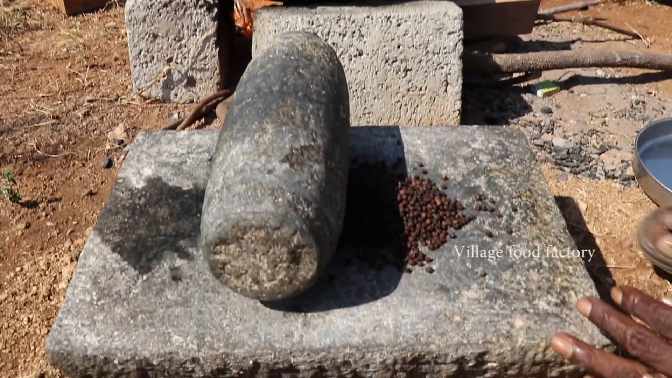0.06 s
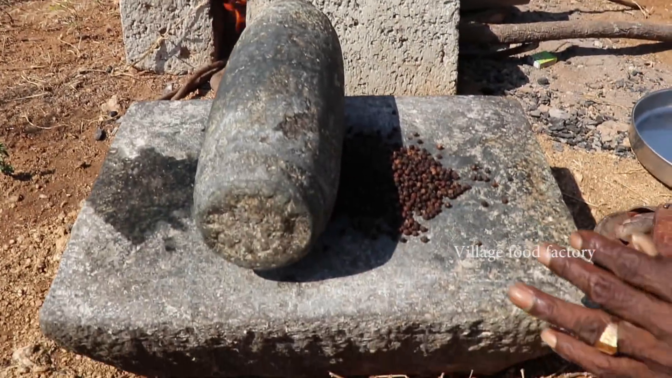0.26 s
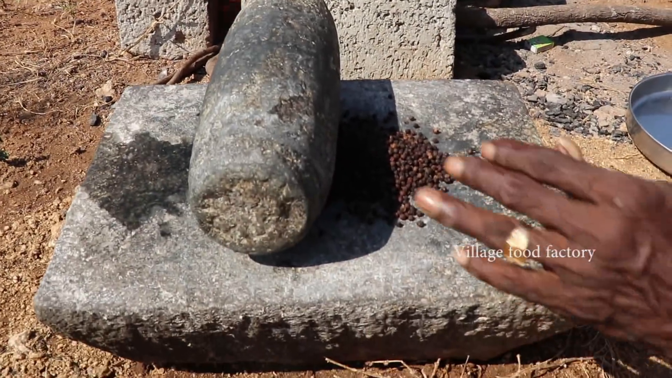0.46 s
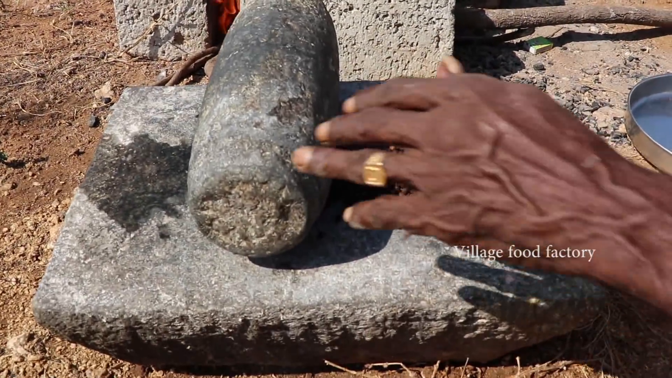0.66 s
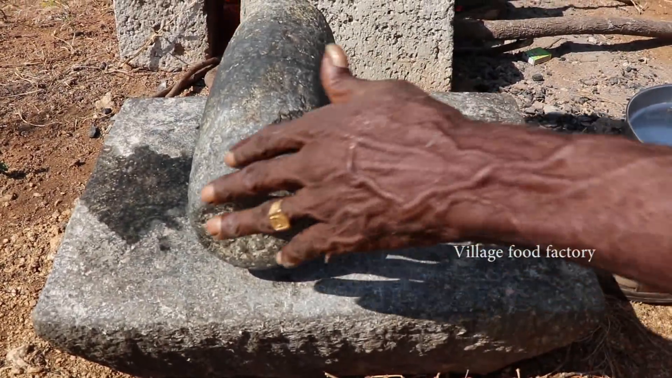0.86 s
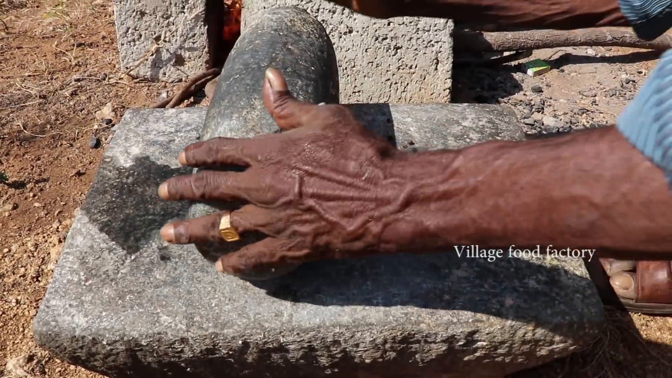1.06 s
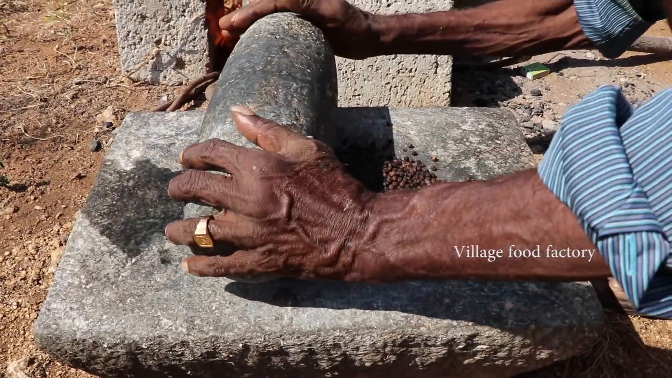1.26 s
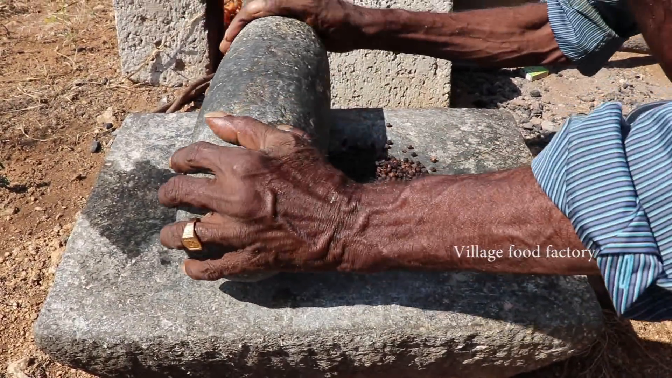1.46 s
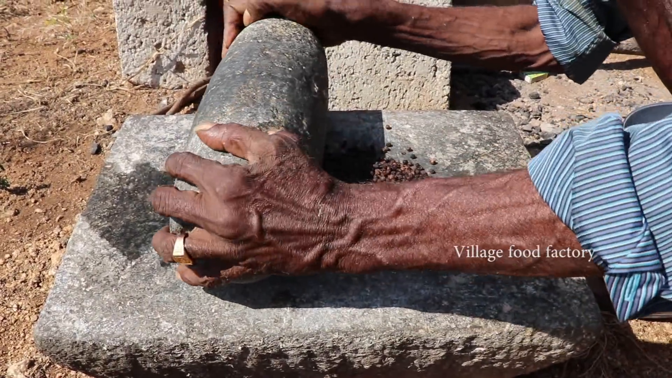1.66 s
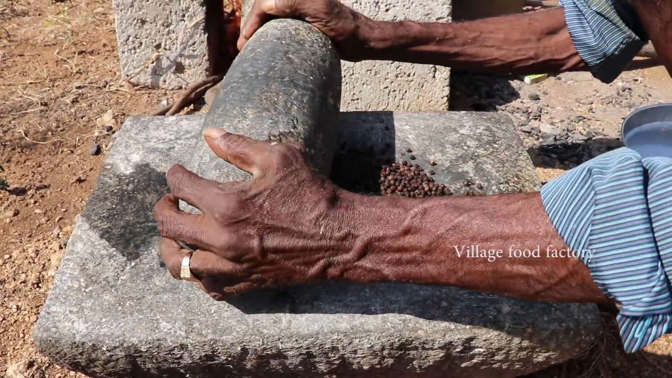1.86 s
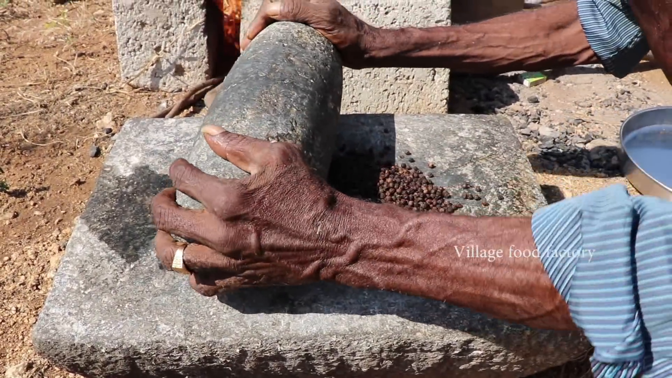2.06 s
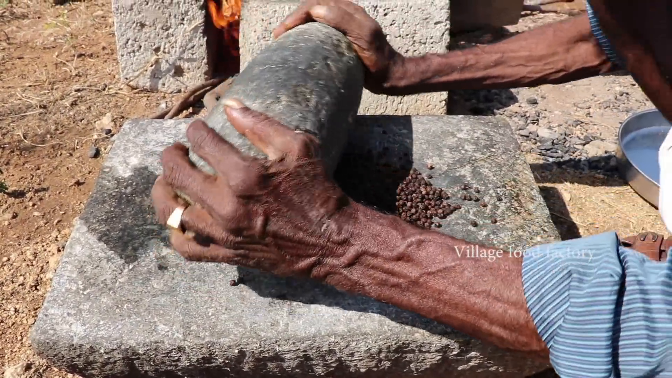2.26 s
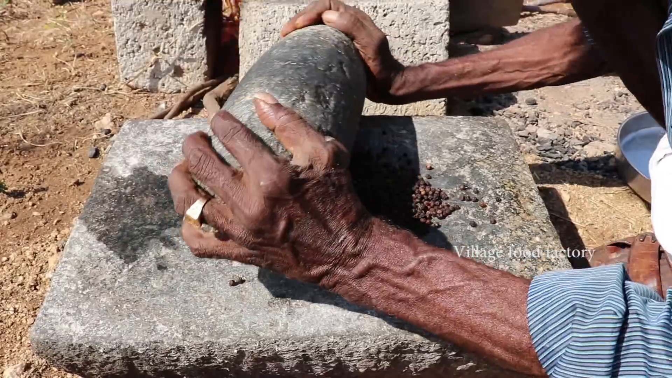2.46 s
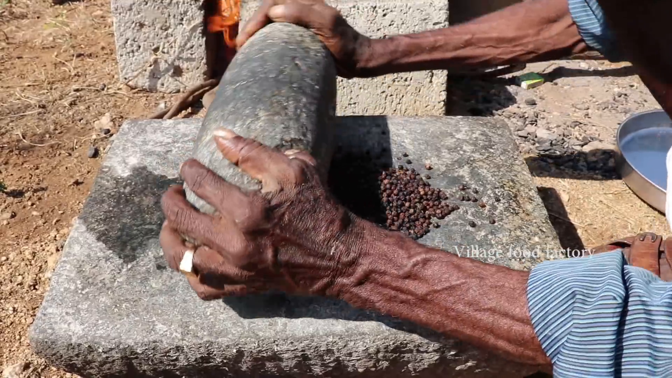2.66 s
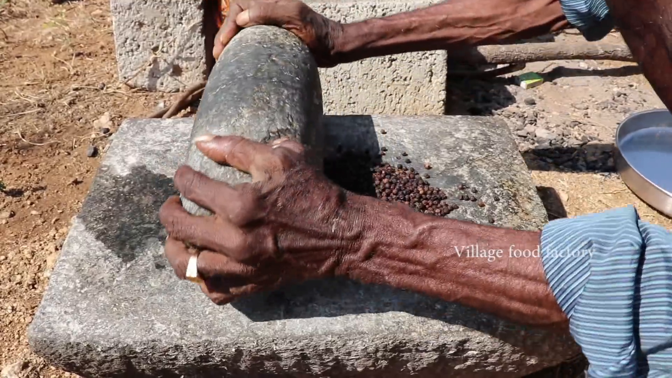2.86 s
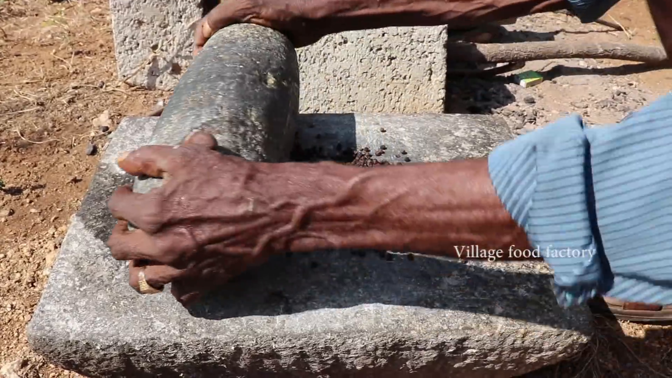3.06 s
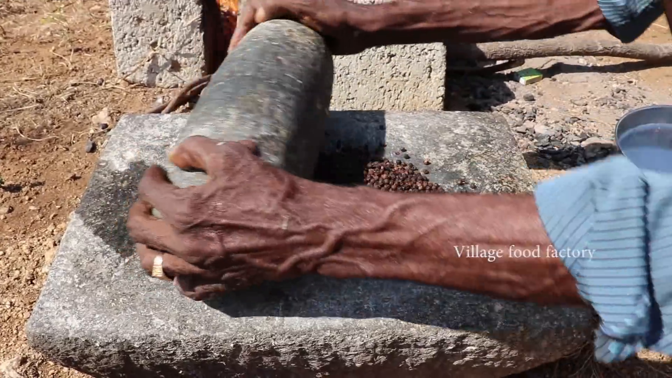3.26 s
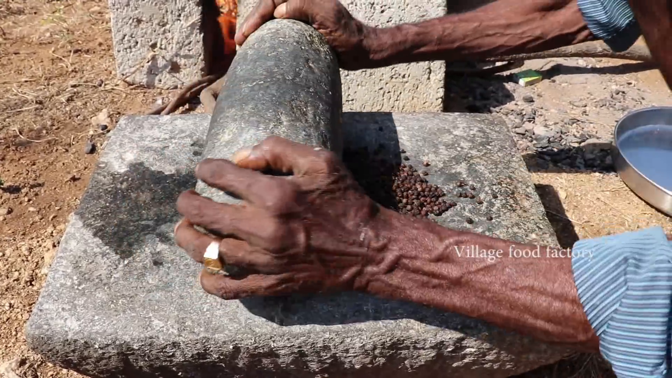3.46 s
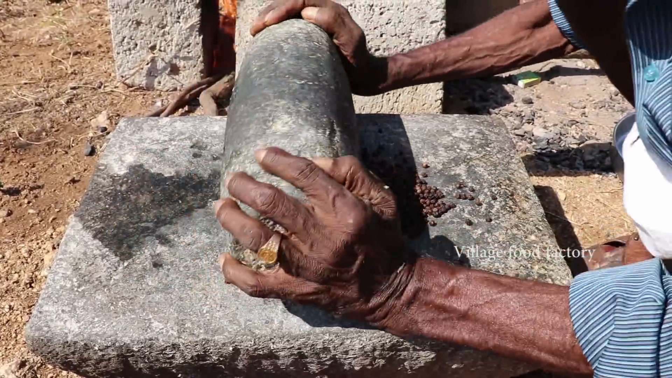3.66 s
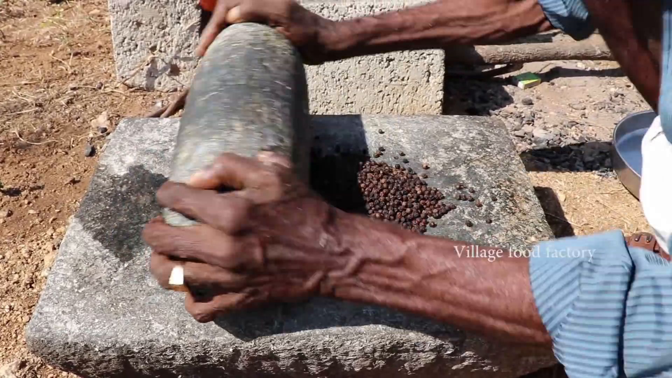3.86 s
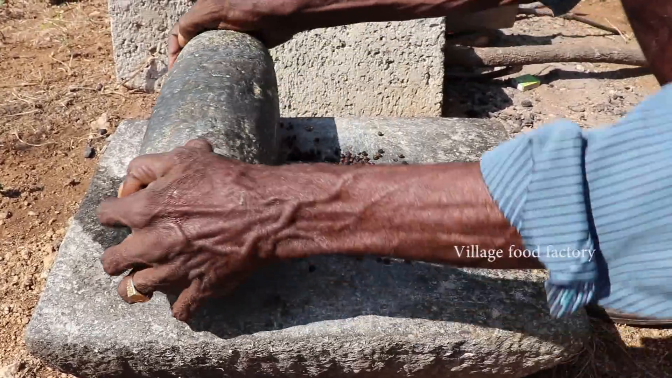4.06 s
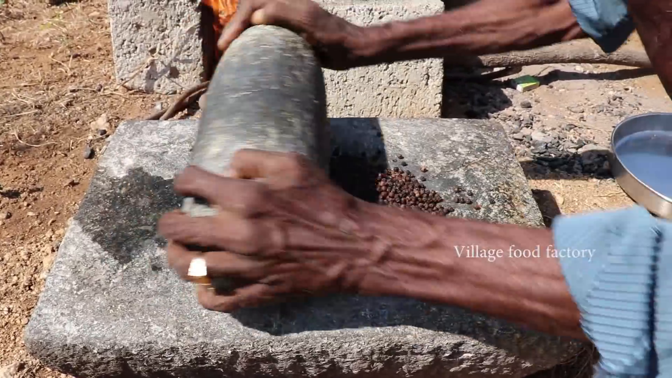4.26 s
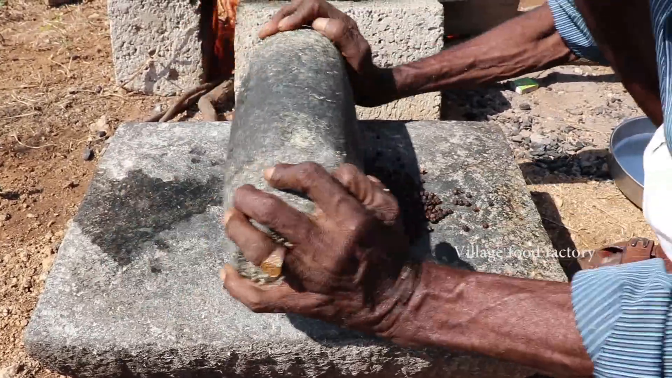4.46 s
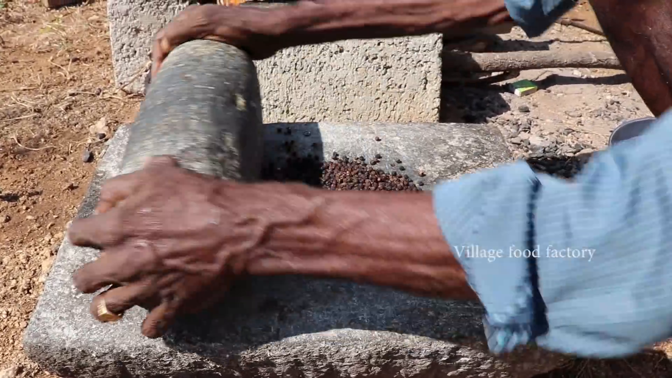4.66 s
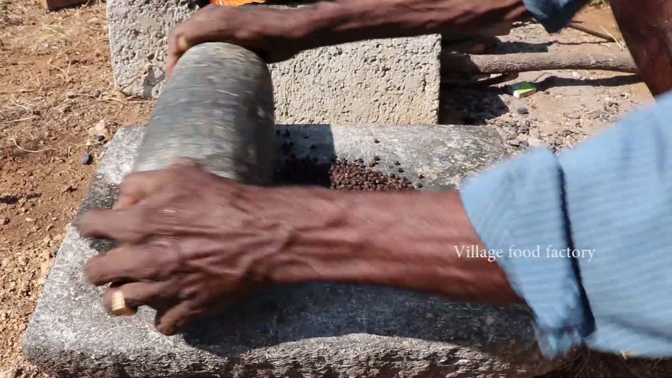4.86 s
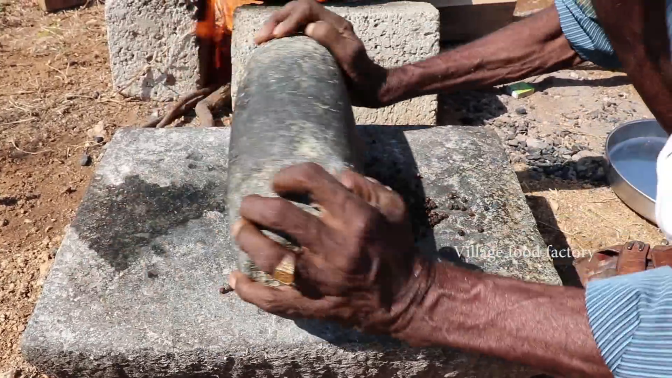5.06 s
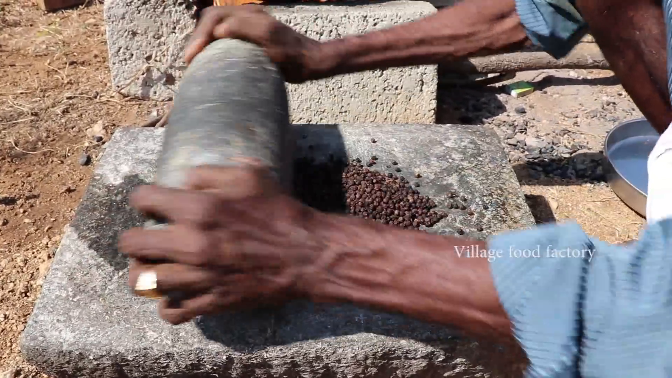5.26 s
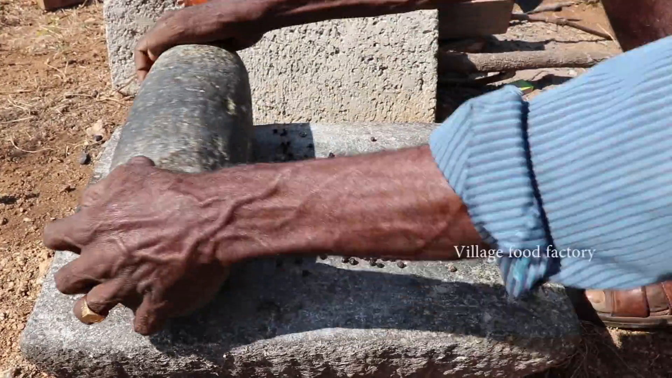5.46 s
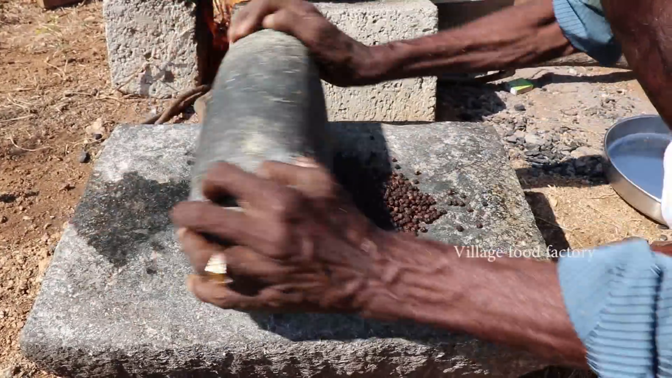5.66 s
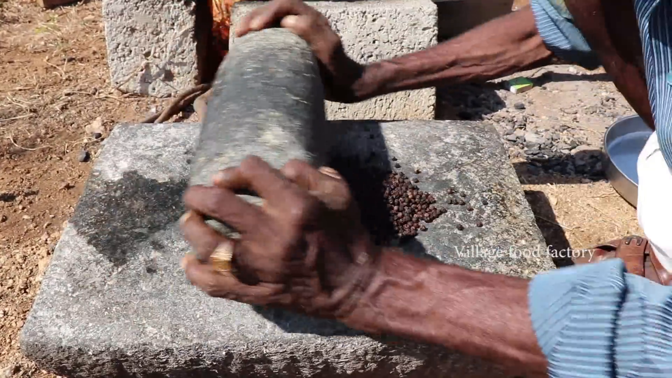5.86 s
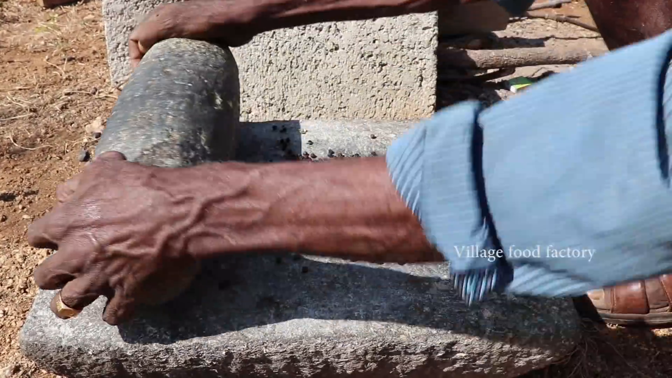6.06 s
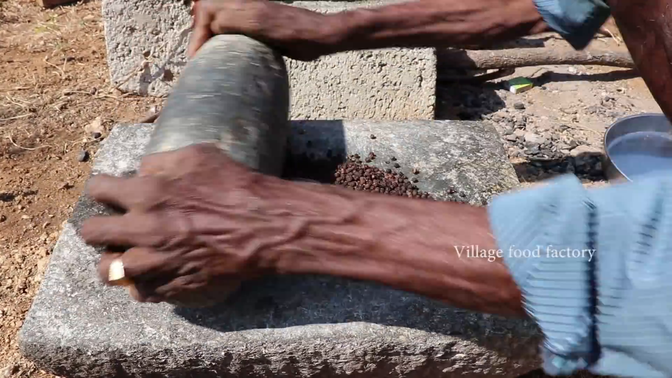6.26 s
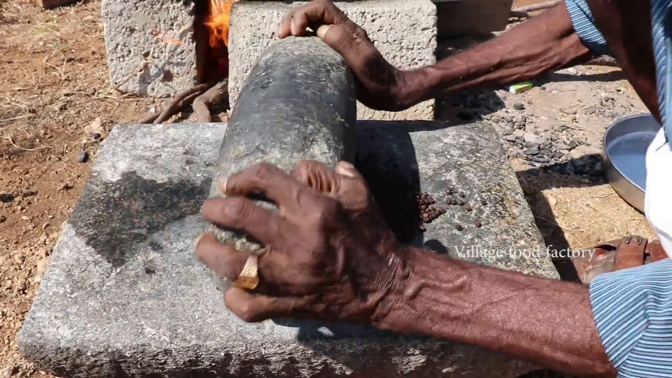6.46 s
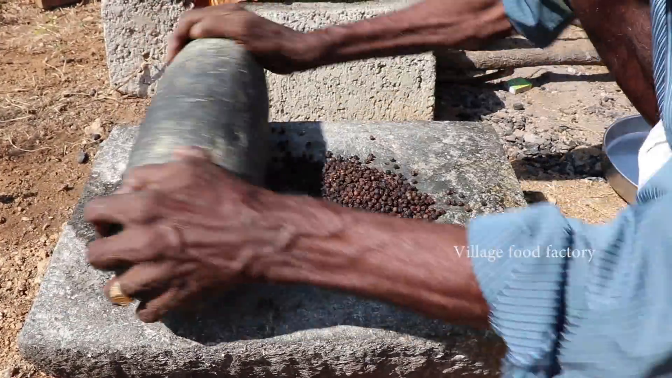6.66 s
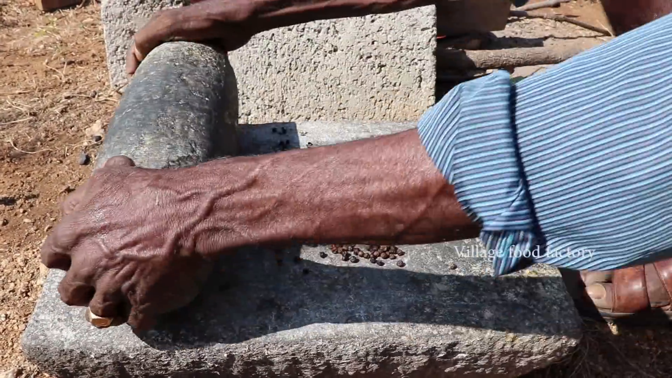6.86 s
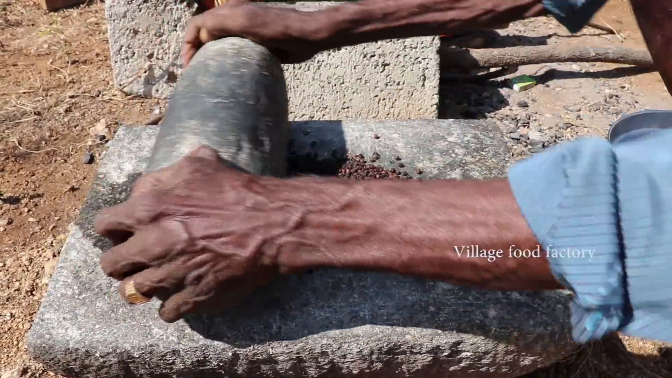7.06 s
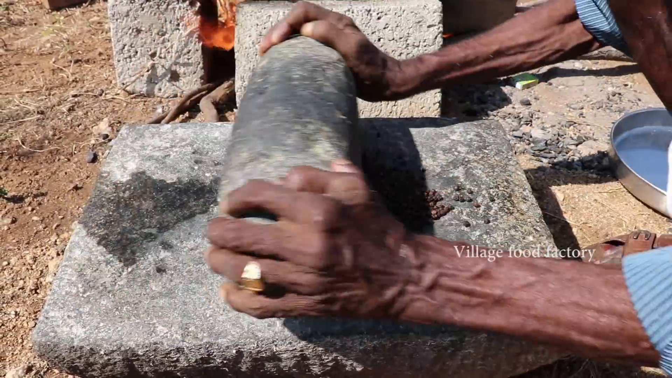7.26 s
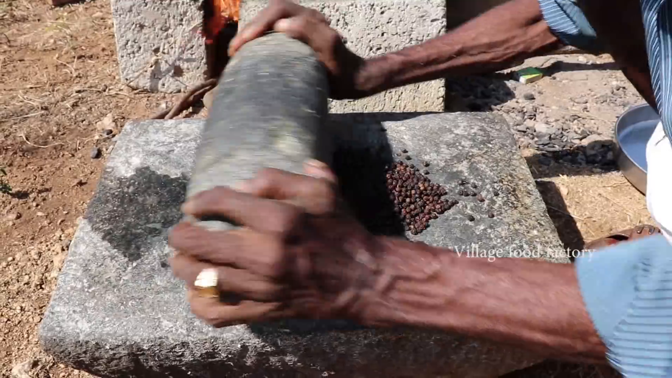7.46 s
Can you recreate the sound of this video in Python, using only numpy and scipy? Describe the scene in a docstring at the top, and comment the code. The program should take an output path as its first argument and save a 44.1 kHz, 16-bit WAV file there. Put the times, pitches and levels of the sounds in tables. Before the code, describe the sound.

A hand takes hold of a stone roller with faint grain ticks and raspy skin rubs, after a brief ringing metal scrape. Then come uneven strokes: crisp husks crackle over hissing grit, low stone rumble passes beneath, and the roller drops onto the slab with hard, bright clacks and rapid rattles. One short skid groans. Recorded close in dry open air, with soft wind thumps on the right that fade later.

```python
"""Outdoors, at a stone slab: a stone roller is rocked to and fro over dry peppercorns, close to the microphones.
Corns snap and crumble as noise bursts, over grains and hiss that swell with each push.
Dropping off them, the roller knocks and chatters: trains of contact pulses ring the stone's modes.
A palm rubs as stick-slip grains; filtered noise makes the rolling, the wind buffeting the right microphone
and the yard. At the start a metal scrape, hiss with ringing sine partials, dies away."""
import sys
import numpy as np
from scipy import signal
from scipy.fft import rfft, irfft, next_fast_len
from scipy.io import wavfile
from scipy.ndimage import uniform_filter1d

SR = 44100
rng = np.random.default_rng(int(sys.argv[2]) if len(sys.argv) > 2 else 0)


def materialize(psi):
    """Save the field psi as 16-bit PCM at rate SR to the path in sys.argv[1].

    A 1-D psi becomes a single channel; in a 2-D psi each row is a channel.
    """
    bounded = np.clip(np.atleast_2d(psi).T, -1, 1)
    quanta = np.round(bounded * 32767).astype(np.int16)
    wavfile.write(sys.argv[1], SR, quanta)


N = 331090
TIME = np.arange(N) / SR  # [s]

# Roller landing on the slab:
# (time [s], strength [dB], first bounce gap [s], main loss per bounce [dB], relative ring [dB])
LANDINGS = [(2.2745, -27, .004, 19, -15), (2.395, -25.5, 0.0039, 15, -21), (2.4435, -22.5, .004, 20, -26),
            (2.6875, 8, 0.009, 10, -3.5), (2.771, -27.5, 0.0028, 4.5, 3.5), (3.8428, 7.5, 0.0091, 7, -5),
            (3.902, -30, 0.0046, 10, 5.5), (4.102, -40, 0.0039, 4.5, 9), (4.139, -46, 0.0049, 14, 22.5),
            (4.579, -14, 0.0036, 27, 11), (4.5926, -16.5, 0.005, 5, 8), (4.6202, -9.5, 0.0041, 5, 1),
            (4.7371, -47, .0043, 13, 22.5), (4.8035, -42, 0.0046, 14, 14), (4.8522, -9.5, .0043, 4.5, 6.5),
            (4.8867, -16.5, 0.0047, 2, 6.5), (4.9306, -14, 0.0039, 10, 6.5), (5.2529, 11, .0079, 12, -8.5),
            (5.2783, -16, 0.0057, 2.5, -5), (5.3307, -19.5, 0.0029, 4.5, 0), (5.5388, -12, 0.0042, 3.5, 8),
            (5.9293, 5.5, .0033, 8.5, -4.5), (5.9568, -11, 0.0051, 1, -3), (5.9649, -4.5, 0.0042, 12, -0.5),
            (6.0153, 6, .0064, 8.5, -2.5), (6.08, -39.5, 0.0045, 5, 11), (6.2234, -22.5, 0.0043, 2.5, 15),
            (6.637, 9.5, 0.006, 13.5, -12), (6.67, -20.5, 0.0053, 2, 3), (6.7492, -25.5, .0077, 23, 11),
            (6.9374, -22.5, .0046, 6, 5)]
# Ring of roller and slab: (centre frequency [Hz], width [Hz], relative level [dB])
STONE_MODES = [(473, 108, 0.5), (815, 130, -8), (1140, 290, -5.5), (1643, 61, -8.5), (1944, 137, -0.5),
               (2610, 97, 8), (3100, 65, 17), (4620, 95, 18)]
# A harder landing is a shorter contact: its pitch at 0 dB, the strength that doubles it,
# and its rise as the cushion of corns is ground down
CONTACT_HZ, CONTACT_DOUBLING_DB, CONTACT_RISE_HZ_PER_S = 853, 43.5, 25.4
# The ground thuds under the slab: level after a 0 dB landing (before panning),
# and the share of the landing's dB that it follows
THUD_HZ, THUD_DECAY_S, THUD_DB, THUD_SHARE = 115, 0.0083, -26.5, 0.21

# Loudest peppercorns breaking: (time [s], relative snap [dB], crumbs against snap [dB])
LOUD_CORNS = [(2.1381, -25, 1.5), (2.2738, -26.5, -12), (2.319, -29, 1.5), (2.3938, -24, 1.5),
              (2.4432, -25, -1), (2.5054, -33.5, -2), (2.5999, -22.5, -4), (2.6672, -32, 13),
              (2.7474, -25, 6), (2.762, -18, -4.5), (3.1932, -33.5, -4), (3.275, -24.5, 8.5),
              (3.3087, -34.5, 10), (3.3422, -29.5, 4), (3.3778, -21, 0), (3.4124, -21, -5),
              (3.4617, -34, -9), (3.56, -28.5, 9.5), (3.619, -10.5, -2), (3.652, -24.5, 11),
              (3.7583, -16.5, -4), (3.7769, -21, -2), (3.7958, -14.5, -1), (3.819, -20, 3),
              (3.8907, -32, 8.5), (4.0348, -28.5, -6), (4.1345, -28, -7), (4.2496, -18, 2),
              (4.274, -19.5, 4), (4.3635, -20.5, 5), (4.4433, -26.5, 10), (4.4964, -19.5, -1),
              (4.5292, -10, -15), (4.5424, -18.5, 9.5), (4.9334, -24, 3), (4.96, -20.5, 0),
              (5.0762, -16, 1), (5.0959, -25, 2), (5.1684, -10, -10), (5.221, -22, 0), (5.5672, -33, -7),
              (5.6235, -19.5, 3), (5.6932, -16, -5), (5.7368, -27, 2), (5.8149, -11.5, 0.5),
              (5.8408, -13, -2), (5.8531, -18.5, 4), (6.0955, -26.5, -3), (6.4308, -13.5, 2),
              (6.4856, -13.5, -8), (6.5269, -6.5, -7), (6.558, -20.5, 7), (6.563, -15, -3),
              (7.002, -23, -13), (7.117, -19, -16), (7.151, -21.5, 11.5), (7.3606, -27, 9.5),
              (7.4107, -10.5, -10)]
# Tone of breaking husk: (frequency [Hz], density [dB per Hz])
HUSK_TONE = [(500, -11.5), (1200, -11), (2000, -7), (2650, -1.5), (3800, -3), (4900, -7.5), (6200, -4.5),
             (7500, -5), (9800, -1), (12500, -3.5), (14500, -12), (16000, -37)]
# Husk ring and its scatter in octaves; left minus right and its scatter
HUSK_HZ, HUSK_SCATTER_OCT, CORN_PAN_DB, CORN_PAN_SCATTER_DB = 9900, 0.3, -2.5, 1
# Lesser corns break at random in each push: snap against the grinding, crumbs against the snap
LESSER_SNAP_DB, LESSER_CRUMB_DB = 10.5, 8
# Finger or ring ticking on the stone as the hand takes hold: (time [s], relative snap [dB])
HAND_TICKS = [(0.3916, -36.5), (.6173, -29), (0.6757, -22), (0.6953, -34), (0.9787, -31.5), (1.0772, -28),
              (1.3062, -29), (1.4336, -29.5), (1.681, -26), (1.89, -26)]
TICK_HZ, TICK_CRUMB_DB, TICK_PAN_DB = 8100, -3.5, -11

# Roller pushed into the heap: (start [s], end [s], final grinding [dB], rise over the push [dB])
HEAP_PUSHES = [(2.231, 2.432, -49.5, 3), (3.277, 3.359, -45, 0.5), (3.461, 3.839, -37.5, 6),
               (4.252, 4.575, -40.5, -2), (4.939, 5.091, -44.5, -1.5), (5.172, 5.238, -35, 8),
               (5.583, 5.914, -39.5, 6), (6.247, 6.429, -40.5, 6), (6.502, 6.625, -34, 9),
               (7.12, 7.514, -39, 1)]
PUSH_ATTACK_S, PUSH_RELEASE_S = 0.027, 0.0055
# Roller shifted or drawn back over dust: (middle [s], half width at half amplitude [s], level [dB])
DUST_SLIDES = [(1.85, 0.93, -56), (2.97, 0.038, -55), (3.26, 0.055, -50.5), (3.95, .045, -49.5),
               (4.06, 0.02, -48), (4.21, 0.036, -53.5), (4.69, 0.053, -45.5), (4.9, 0.06, -54.5),
               (5.38, 0.021, -41), (5.56, 0.044, -53), (6.04, .05, -55), (6.23, 0.066, -60),
               (6.79, 0.13, -48.5), (7.06, 0.036, -46.5)]
DUST_DB = -56  # loose dust under the roller between strokes

# Bare stone rolling on stone: (start [s], end [s], rumble level [dB])
BARE_ROLLS = [(2.936, 3.35, -46), (4.217, 4.55, -45), (4.93, 5.08, -50.5), (5.687, 5.863, -47.5),
              (6.254, 6.483, -51), (7.09, 7.217, -50)]
# Rumble of the pitted roller: (frequency [Hz], width [Hz], relative level [dB])
RUMBLE_MODES = [(258, 220, -8), (374, 82, 8), (700, 290, -17), (1007, 35, -2.5), (1535, 30, -9),
                (2630, 240, -5)]
ROLL_ATTACK_S, ROLL_RELEASE_S = 0.065, 0.018
ROCKING_DB = -58.5  # faint rumble between rolls
# Rumble of the one skid: (time [s], level [dB], decay [s])
SKID_RUMBLE = (2.888, -39, 0.028)
# Hiss of the skid: (frequency [Hz], width [Hz], relative level [dB])
SKID_HISS_MODES = [(2920, 300, -8), (3400, 350, 0), (7650, 460, 0.5), (9460, 280, 3.5), (11400, 700, -27)]
# Stone groaning in the skid: (time [s], pitch [Hz], peak level [dB], decay [s])
SKID_GROANS = [(2.888, 417, -22.5, 0.023), (2.907, 1053, -28, 0.012)]

# Palm sliding on the roller: (start [s], end [s], relative level [dB])
PALM_RUBS = [(0.605, .7, -46), (0.87, .95, -48.5), (0.978, 1.067, -35.5), (1.056, 1.136, -33.5),
             (1.19, 1.34, -37), (1.397, 1.443, -44)]
# Tone of skin on gritty stone: (frequency [Hz], density [dB per Hz])
PALM_TONE = [(400, -9), (900, -12), (1200, -2.5), (1700, -3), (2800, -5), (4800, -12.5), (8500, -10),
             (14000, -24)]
RUB_ATTACK_S, RUB_RELEASE_S = 0.019, 0.036

# Partials of the scraped metal: (frequency [Hz], level [dB])
METAL_PARTIALS = [(430, -50.5), (571, -40), (800, -56.5), (1000, -41.5), (1034, -45.5), (1324, -43),
                  (1550, -43), (1600, -50), (1927, -32), (1968, -44), (2213, -38), (2299, -43), (2580, -55),
                  (2686, -52), (2735, -33), (3106, -43.5), (3182, -41), (3548, -49), (4032, -52),
                  (4495, -43), (5012, -59), (5529, -46), (6643, -50), (7225, -44)]
# Tone of the scrape hiss: (frequency [Hz], density [dB per Hz])
SCRAPE_TONE = [(700, -7.5), (1200, -2), (2300, 3), (4800, -5), (7000, -4), (9700, -2), (13400, -10.5),
               (15500, -59)]
# Fade of the scrape hiss: (time [s], relative level [dB])
SCRAPE_STROKE = [(0, -21.5), (.045, -28), (.06, -20), (.1, -29), (.15, -38), (.2, -40.5), (.26, -66),
                 (.5, -100)]

# Breeze on the right microphone, in the end dying away: (time [s], level [dB])
BREEZE_LEVEL = [(0, -38.5), (1.3, -43.5), (2.2, -39), (3.1, -45), (4.2, -38), (5.3, -53), (7.5, -64)]
# Gusts on top of it: (middle [s], half width at half amplitude [s], level [dB])
WIND_GUSTS = [(.08, 0.028, -20.5), (.26, 0.052, -24), (.38, .035, -17.5), (.52, 0.079, -25),
              (.76, 0.07, -31.5), (1.1, 0.13, -35.5), (1.3, 0.09, -36.5), (1.63, 0.062, -27),
              (1.8, 0.066, -30), (2.5, 0.15, -35), (3.78, 0.043, -40), (4.33, .11, -29),
              (4.68, 0.038, -34.5), (5.18, .06, -37.5)]
# Flutter under a gust of reference strength; it grows faster than the rumble, by this power
GUST_REFERENCE_DB, FLUTTER_DB, FLUTTER_POWER = -19.5, -26, 1.28

# Low outdoor rumble: (frequency [Hz], density [dB per Hz])
YARD_TONE = [(22, -36), (45, 3.5), (80, 1.5), (140, -1), (250, -6.5), (500, -17), (1000, -23.5),
             (2600, -31), (5000, -48), (10000, -76), (15000, -77)]
# Open air: (frequency [Hz], density [dB per Hz])
AIR_TONE = [(30, 9.5), (150, -2), (500, -3.5), (1200, -6.5), (2600, -3.5), (5000, -18.5), (10000, -13),
            (15000, -58)]
TOP_HZ = 16200


def knocks(restitution=.86, soften=0.91, edge=0.062, count=8):
    """Each landing is a train of bounces, each sooner, weaker and softer than the last."""
    out = np.zeros(N)
    t = np.arange(-200, 7992) / SR
    chance = rng.standard_normal((len(LANDINGS), len(STONE_MODES), 2))
    for (s, db, gap, loss_db, ring_db), place in zip(LANDINGS, chance):
        push, at = np.zeros(len(t)), 0
        contact_hz = (CONTACT_HZ + CONTACT_RISE_HZ_PER_S * s) * 2 ** (db / CONTACT_DOUBLING_DB)
        for k in range(count):
            u = (np.pi * contact_hz * soften ** k * (t - at)) ** 2
            force = undb(db - loss_db * k ** 0.7 - 0.23 * k * k)
            # the stone radiates the curvature of the contact force
            pulse = (1 - 2 * u) * np.exp(-u)
            # hard blows add a sharp edge
            sharp = edge * np.sqrt(force) * np.exp(-abs(t - at) * 16000)
            push += force * (pulse + sharp)
            at += gap * restitution ** k
        # the place of contact shifts the modes and their strengths
        modes = [(hz * (1 + .025 * shift), width, mode_db + 1.5 * lift)
                 for (hz, width, mode_db), (shift, lift) in zip(STONE_MODES, place)]
        ring = undb(4.5 + ring_db) * resonate(push, modes)
        start = int((s + t[0]) * SR)
        out[start:start + len(t)] += ring + undb(-5.0) * push + thud(db, t)
    return out * pan(-3.2)


def thud(db, t):
    """The dull answer of the ground to a landing, a decaying sine much alike for hard and soft ones."""
    age = np.maximum(t, 0)
    level = undb(THUD_DB + THUD_SHARE * db)
    return level * np.exp(-age / THUD_DECAY_S) * np.sin(2 * np.pi * THUD_HZ * age)


def cracks(snap_s=0.00014, crumb_s=0.0055, lead_s=0.0035, husk_width=0.59, ring_db=3):
    """A husk splits with one snap, in a noise burst with a short fade-in and a longer fade-out around it."""
    out = np.zeros((2, N))
    t = np.arange(-400, 900) / SR
    after = np.maximum(t, 0)

    def rough_noise():
        """Noise with a few strong peaks among the weak."""
        sizes = undb(3.6 * np.minimum(rng.exponential(size=len(t)), 5))
        return rng.standard_normal(len(t)) * sizes

    for s, db, crumb_db, hz, pan_db in breakages():
        # a single click with a very short tail of noise
        tail = stereo(lambda: rng.standard_normal(len(t)), apart=.4) * .3
        snap = (t >= 0) * np.exp(-after / snap_s) * tail + (t == 0)
        # a short fade-in before the snap and a longer fade-out after it
        fade = np.where(t < 0, 0.58 * np.exp(t / lead_s), np.exp(-after / crumb_s))
        crumbs = stereo(rough_noise, apart=0.96) * fade
        b, a = signal.iirpeak(min(hz, SR / 3), 1 / husk_width, fs=SR)
        snap, crumbs = (v + undb(ring_db + 5) * signal.lfilter(b, a, v) for v in (snap, crumbs))
        burst = snap / np.linalg.norm(snap) + undb(crumb_db) * crumbs / np.linalg.norm(crumbs)
        start = int((s + t[0]) * SR)
        out[:, start:start + len(t)] += burst * undb(db + 15) * pan(pan_db)
    return colour(out, HUSK_TONE)


def breakages(count=3):
    """Loud corns, lesser ones in each push, and ticks of finger or ring on the stone, each snap as (time [s],
    relative snap [dB], crumbs against snap [dB], ring [Hz], left minus right [dB])."""
    pressure, corns = pushing(), list(LOUD_CORNS)
    for (start, end, _, _), shares in zip(HEAP_PUSHES, rng.random((len(HEAP_PUSHES), count))):
        last = min(end, TIME[-1] - .03)  # leave room for the burst
        for s in start + (last - start) * shares:
            grinding_db = 20 * np.log10(pressure[int(s * SR)])
            corns.append((s, grinding_db + LESSER_SNAP_DB, LESSER_CRUMB_DB))
    rows = []
    for (s, db, crumb_db), (small, side) in zip(corns, rng.standard_normal((len(corns), 2))):
        hz = HUSK_HZ * 2 ** (HUSK_SCATTER_OCT * small)
        rows.append((s, db, crumb_db, hz, CORN_PAN_DB + CORN_PAN_SCATTER_DB * side))
    return rows + [(s, db, TICK_CRUMB_DB, TICK_HZ, TICK_PAN_DB) for s, db in HAND_TICKS]


def grit():
    """Countless husk fragments break in small surges over a fine hiss of stone on dust."""
    pressure = np.sqrt(pushing() ** 2 + swells(DUST_SLIDES) ** 2 + undb(DUST_DB) ** 2)
    crunch = np.clip(pressure / undb(-43), .3, .92)  # more pressure, more fragments and less dust
    pieces = stereo(lambda: grains(density=.05, spread_db=3.8), apart=.55)
    pieces = pieces * surges() * undb(2.2 * walk(70))
    dust = stereo(lambda: rng.standard_normal(N), apart=0.93)
    mix = crunch * pieces + np.sqrt(1 - crunch ** 2) * dust
    sound = colour(mix * pressure, HUSK_TONE)
    return flicker(sound, 2420, 12300, flicker_db=3.5, rate=45, count=12) * pan(-4)


def pushing():
    """Pressure on the heap: its level climbs or sinks steadily through each push, then lets go."""
    total = 0
    for start, end, db, rise_db in HEAP_PUSHES:
        remaining = np.clip((end - TIME) / (end - start), 0, 1)
        total = total + hold(start, end, PUSH_ATTACK_S, PUSH_RELEASE_S) * undb(db - rise_db * remaining)
    return total


def surges(rate=45, size_db=3, decay_s=0.0051):
    """Fragments give way in little avalanches, each sudden and quickly over."""
    sizes = undb(size_db * np.minimum(rng.exponential(size=N), 2.5))
    starts = (rng.random(N) < rate / SR) * sizes
    return unit(1.6 + signal.lfilter([1], [1, -np.exp(-1 / (decay_s * SR))], starts))


def rolling():
    """The pitted roller rumbles on the slab, and skids once with a groan and a hiss."""
    s, db, decay_s = SKID_RUMBLE
    since = np.maximum(TIME - s, 0)
    skid = (TIME > s) * undb(db) * np.exp(-since / decay_s)
    rocking = undb(ROCKING_DB) * np.minimum(TIME / BARE_ROLLS[0][0], 1)  # fades in until the first roll
    rolls = sum(undb(roll_db) * hold(start, end, ROLL_ATTACK_S, ROLL_RELEASE_S)
                for start, end, roll_db in BARE_ROLLS)
    speed = np.hypot(rocking, rolls)
    pits = unit(resonate(band(rng.standard_normal(N), 140, 2860), RUMBLE_MODES))
    rumble = pits * undb(2 * walk(35)) * (speed + skid)
    for start, hz, groan_db, fade_s in SKID_GROANS:
        age = np.maximum(TIME - start, 0)
        wobbly_cycles = hz * age * (1 + 0.019 * walk(110))
        rumble += undb(groan_db) * np.exp(-age / fade_s) * np.sin(2 * np.pi * wobbly_cycles)
    hiss = stereo(lambda: unit(resonate(rng.standard_normal(N), SKID_HISS_MODES)), apart=0.58)
    hiss_fade = (TIME > s) * undb(-39.0) * np.exp(-since / 0.081)
    return (rumble + hiss * hiss_fade) * pan(-3.9)


def palm():
    """Dry skin catches and slips on the gritty stone as the hand takes hold."""
    slips = stereo(lambda: grains(density=.12, spread_db=3.4), apart=.4) * undb(1.8 * walk(100))
    rubbing = np.sqrt(sum((undb(db) * hold(start, end, RUB_ATTACK_S, RUB_RELEASE_S)) ** 2
                          for start, end, db in PALM_RUBS))
    skin = flicker(colour(slips, PALM_TONE), 1120, 6000, flicker_db=4.0, rate=60)
    return skin * rubbing * pan(-7.0) * undb(-.5)


def metal(ring_s=0.1):
    """A scrape on thin metal fades out, its partials ringing a little longer, the low ones longest."""
    hiss = stereo(lambda: unit(band(colour(rng.standard_normal(N), SCRAPE_TONE), 480, 17000)), apart=0.97)
    t, ring = TIME[:SR], np.zeros((2, N))
    for hz, db in METAL_PARTIALS:
        decay_s = ring_s * (1000 / hz) ** .5
        fade = np.exp(-np.maximum(t - .07, 0) / decay_s) * undb(2 * walk(34.7)[:SR])
        # a start in the cycle that differs somewhat between left and right
        phase = rng.random() + 0.55 * rng.random((2, 1))
        ring[:, :SR] += np.sqrt(2) * undb(db) * fade * np.sin(2 * np.pi * (hz * t + phase))
    return hiss * curve(SCRAPE_STROKE) * undb(-3.5) * pan(-11.0) + ring * pan(-2.5)


def wind():
    """Eddies rumble on the right microphone; stronger gusts flutter higher."""
    def eddies(low_hz, high_hz):
        """Band of noise with its slow level changes evened out."""
        x = band(rng.standard_normal(N), low_hz, high_hz, order=3)
        return x / np.sqrt(uniform_filter1d(x ** 2, 3000) + 1e-12)

    strength = np.hypot(curve(BREEZE_LEVEL), swells(WIND_GUSTS)) * undb(1.7 * walk(8.3))
    flutter = undb(FLUTTER_DB) * (strength / undb(GUST_REFERENCE_DB)) ** FLUTTER_POWER
    gusts = eddies(37.6, 118.3) * strength + eddies(84, 269) * flutter
    return gusts * np.array([[undb(-25.5)], [1]])  # the left hears only a trace


def yard():
    """Low outdoor rumble, alike at both microphones, under faint air."""
    rumble = colour(rng.standard_normal(N), YARD_TONE) * undb(-44.5)
    air = colour(rng.standard_normal((2, N)), AIR_TONE) * undb(-51.0)
    return rumble + air


def grains(density, spread_db):
    """Tiny clicks at a share of all samples: mostly weak, a few strong."""
    sizes = undb(spread_db * np.minimum(rng.exponential(size=N), 5.5))
    return unit(rng.standard_normal(N) * sizes * (rng.random(N) < density))


def flicker(sound, low_hz, high_hz, flicker_db, rate, count=8):
    """Each band wavers in level on its own; the top above them stays steady."""
    out = 0
    for hz in np.geomspace(low_hz, min(high_hz, SR / 3), count):
        low = signal.sosfiltfilt(signal.butter(4, hz, fs=SR, output="sos"), sound)
        out = out + low * undb(flicker_db * walk(rate))
        sound = sound - low
    return out + sound


def swells(table):
    """Gain over time of bell-shaped swells (middle [s], half width [s], level [dB])."""
    return sum(undb(db) * 2 ** -((TIME - s) / half_s) ** 2 for s, half_s, db in table)


def hold(start, end, attack_s, release_s):
    """Envelope that swells up to the start, holds, and dies away after the end."""
    return np.exp(np.minimum(TIME - start, 0) / attack_s - np.maximum(TIME - end, 0) / release_s)


def curve(table):
    """Gain over time from points (time [s], level [dB])."""
    return undb(np.interp(TIME, *np.transpose(table)))


def walk(rate):
    """Smooth random wander of spread near 1, from fresh values at the rate [Hz]."""
    size = int(SR / rate)
    steps = np.repeat(rng.standard_normal(N // size + 1), size)
    return unit(uniform_filter1d(steps, size)[:N])


def stereo(draw, apart):
    """A random texture at two microphones: one part shared, one part that each hears alone."""
    apart = np.clip(apart, 0, 1)
    return np.sqrt(1 - apart) * draw() + np.sqrt(apart) * np.array([draw(), draw()])


def pan(db):
    """Left and right gains of unit mean power, from left minus right [dB]."""
    return unit(undb(np.array([[db], [-db]]) / 2))


def colour(x, points, size=8192):
    """Causal filter with the outline (frequency [Hz], density [dB per Hz]) and unit power gain."""
    hz, db = np.transpose(points)
    f = np.fft.rfftfreq(size, 1 / SR)
    outline = undb(np.interp(np.log(f + 1), np.log(hz), db))
    # folding the cepstrum gives minimum phase
    cepstrum = irfft(np.log(outline))[:size // 2]
    cepstrum[1:] *= 2
    taps = irfft(np.exp(rfft(cepstrum, size)))
    taps = taps / np.linalg.norm(taps)
    return signal.oaconvolve(np.atleast_2d(x), taps[None], axes=1)[:, :N].reshape(x.shape)


def resonate(x, modes):
    """Parallel resonances (frequency [Hz], width [Hz], level [dB])."""
    size = 2 * next_fast_len(len(x) // 2 + 1)
    f = np.fft.rfftfreq(size, 1 / SR)
    response = sum(undb(db) * 1j * f * width / (hz ** 2 - f ** 2 + 1j * f * width)
                   for hz, width, db in modes)
    return irfft(rfft(x, size) * response, size)[:len(x)]


def band(x, low_hz, high_hz, order=2):
    """Butterworth band-pass."""
    edges = [low_hz, min(high_hz, SR / 2 - 1)]
    return signal.sosfilt(signal.butter(order, edges, "band", fs=SR, output="sos"), x)


def undb(db):
    """Decibels to gain."""
    return 10 ** (np.asarray(db) / 20)


def unit(x):
    """Scale to rms 1."""
    return x / np.sqrt(np.mean(x ** 2))


def scene():
    """Everything heard at the slab."""
    return knocks() + cracks() + grit() + rolling() + palm() + metal() + wind() + yard()


def record(dry):
    """Overload clips the highest peaks, and a steep low-pass cuts the top."""
    clipped = np.clip(dry, -.97, .97)
    return signal.sosfilt(signal.ellip(8, .2, 70, TOP_HZ, fs=SR, output="sos"), clipped)


dry = scene()
out = record(dry)
materialize(out)
```